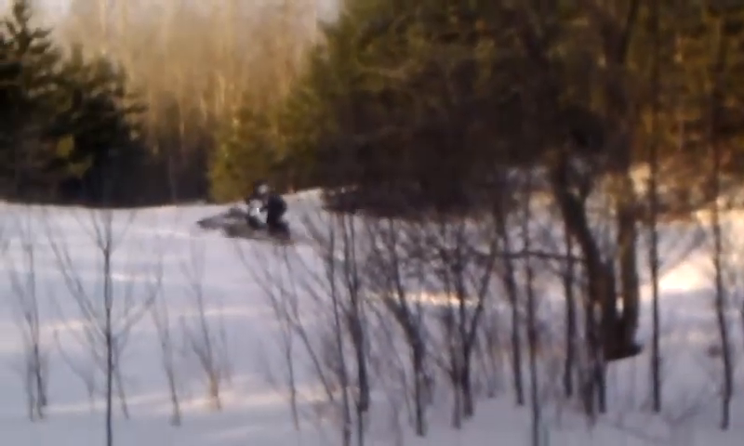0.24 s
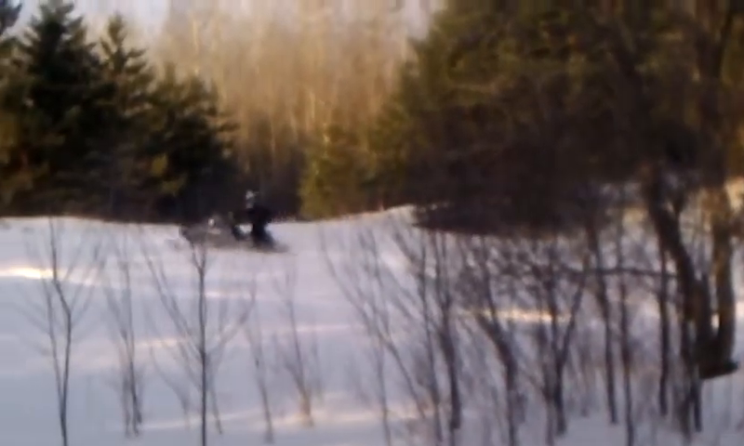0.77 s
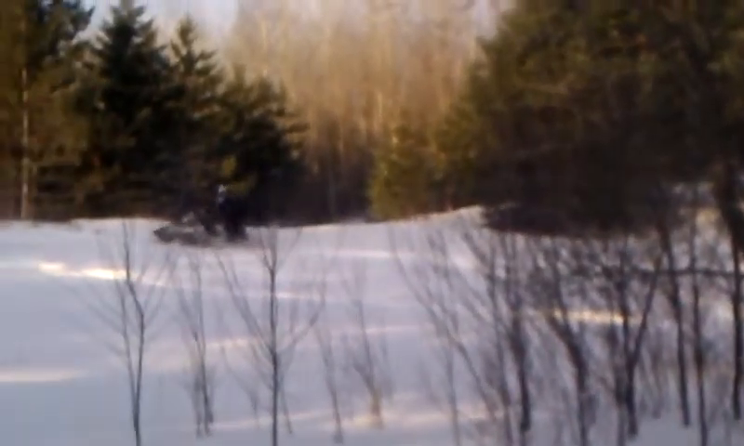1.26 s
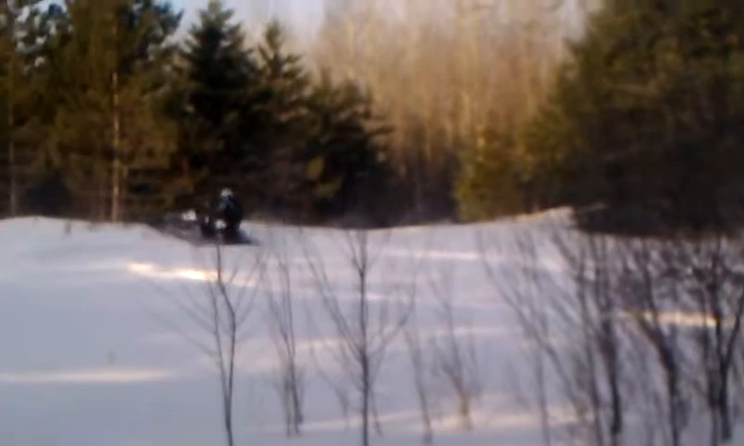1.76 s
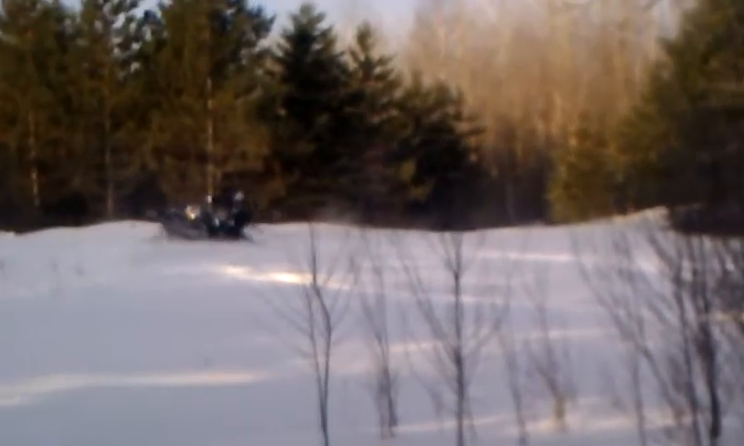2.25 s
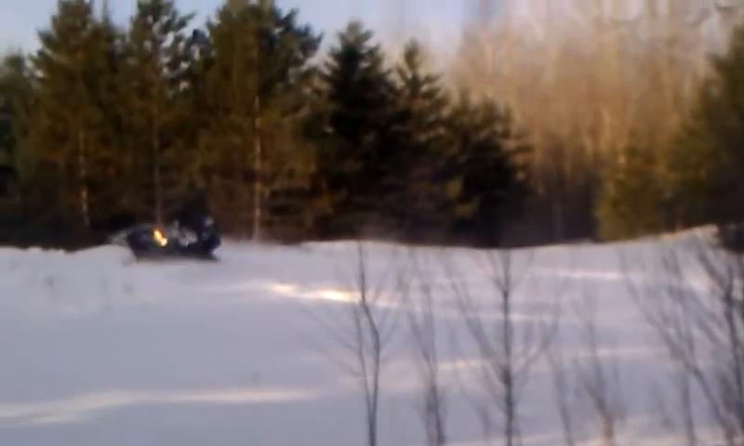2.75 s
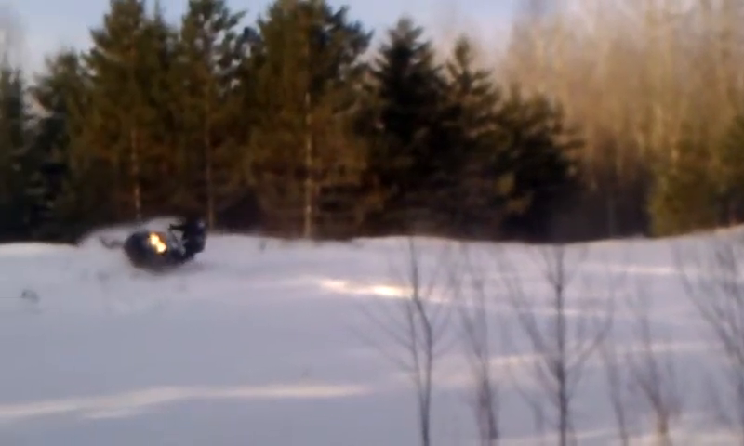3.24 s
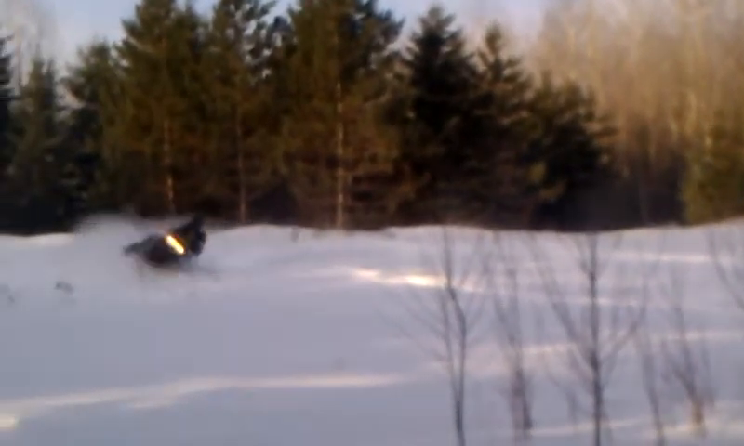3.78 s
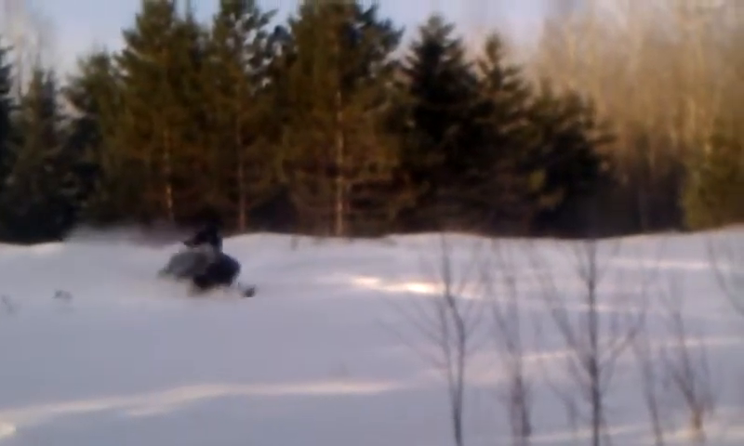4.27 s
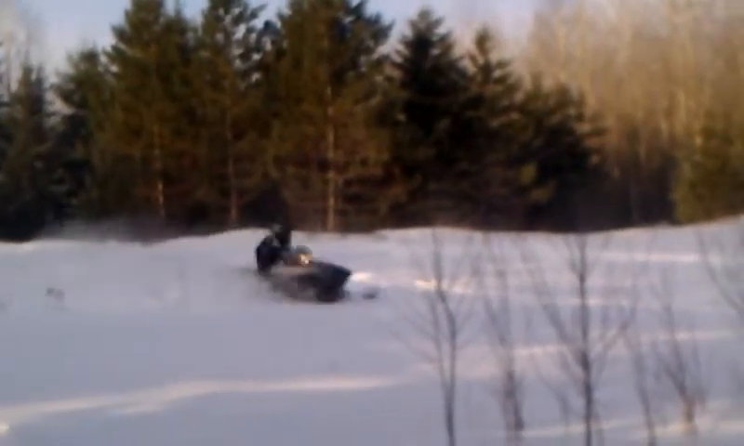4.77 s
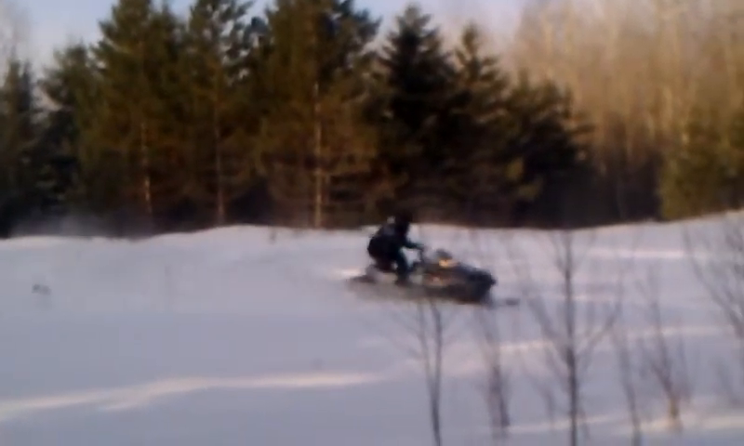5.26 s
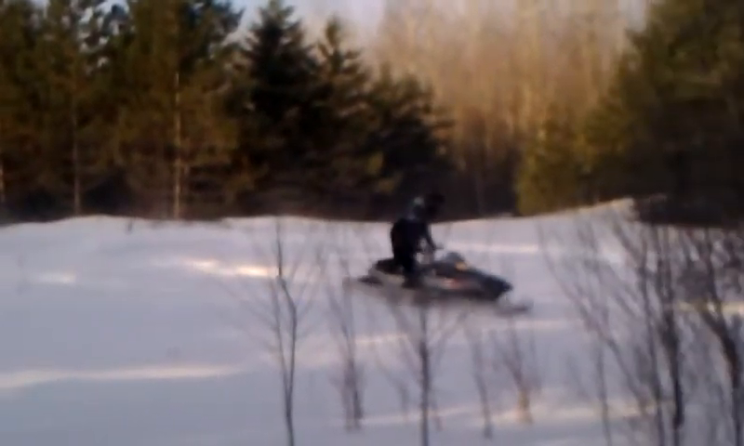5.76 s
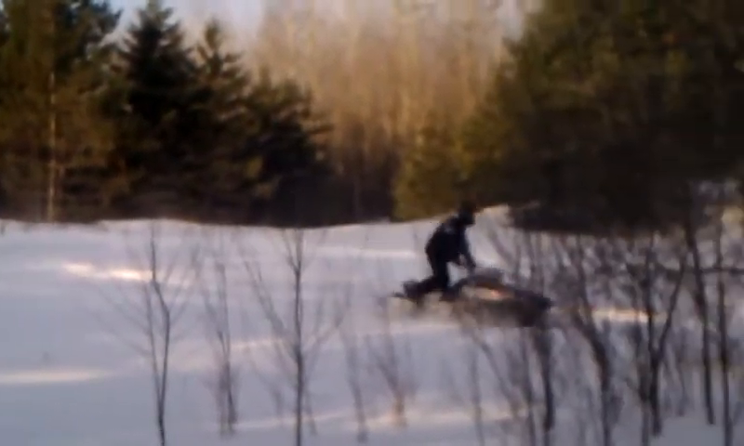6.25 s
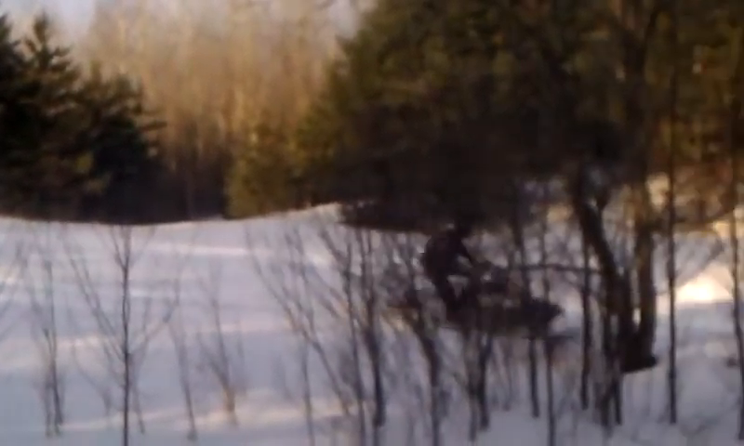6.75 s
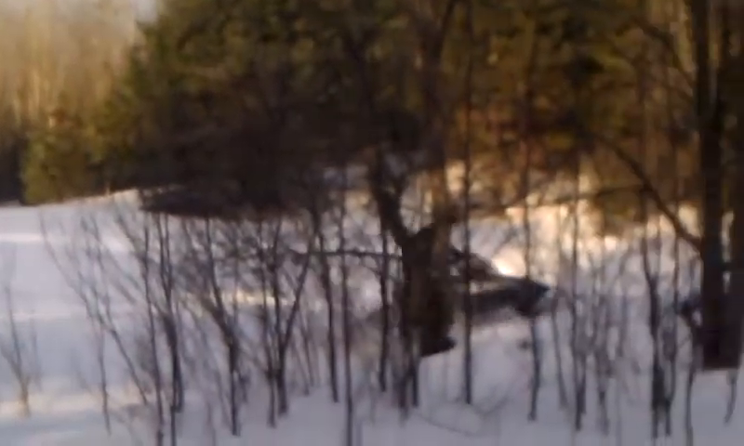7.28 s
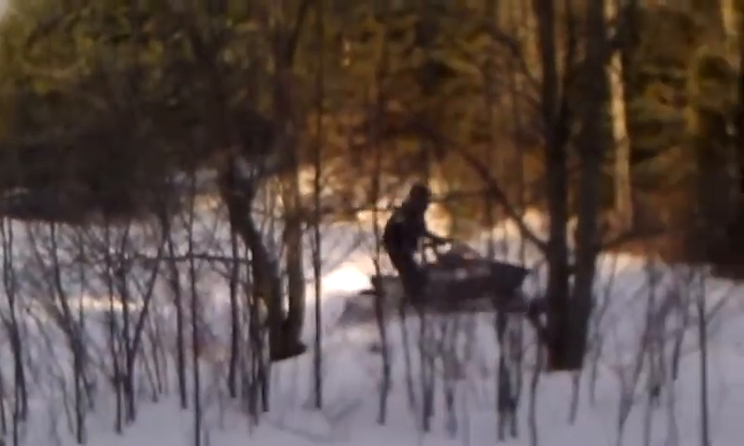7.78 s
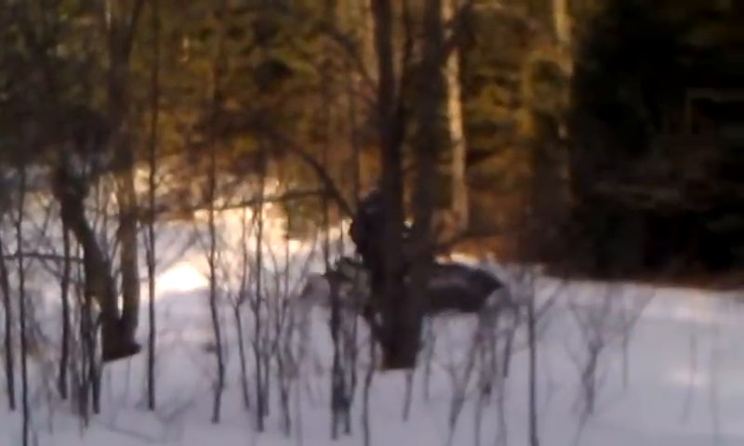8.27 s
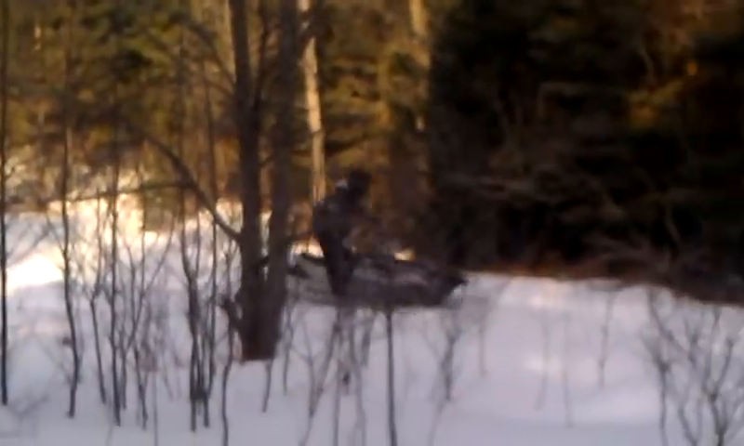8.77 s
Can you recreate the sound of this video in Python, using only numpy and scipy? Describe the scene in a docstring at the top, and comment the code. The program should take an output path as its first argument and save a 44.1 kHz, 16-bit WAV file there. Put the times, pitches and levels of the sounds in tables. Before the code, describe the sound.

A two-stroke snowmobile runs over snow beside woods, captured by one overloaded outdoor microphone. From 0 s it buzzes raspily, with short rev rises around 0.3 and 0.8 s, sinking to a low burble near 1.35 s. It revs again at 1.5 s, and from about 1.8 to 4.9 s holds a piercing, nasal, fluttering howl at almost steady pitch, stronger and brighter around 4 s as it swings round, with thin sizzle growing on top. At 4.9 s the throttle closes; pitch tumbles until 5.6 s while a faint howl echoes from the trees. A hard barking blip at 5.7 s leads into popping around 6.2 s, a longer rev from 6.5 to 7.1 s, more pops, and a sharp stab at 7.5 s. Dense crackling backfires follow from 7.7 s, thinning into a throaty near-idle burble with track and clutch rattle until 9 s.

```python
"""Two-stroke snowmobile on a snowy field

The engine blips, howls flat out through a turn, then comes back near the listener with pops and barks.
Multiples of the firing rate and pulsed noise, filtered by pipe and silencer, make the exhaust.
Steady partials make the howl, decaying pipe modes the pops, and coloured noise the track and clutch.
The forest edge returns scattered echoes; the microphone clips and gain control holds the level down."""
import sys
import numpy as np
from scipy import signal
from scipy.io import wavfile
from scipy.ndimage import uniform_filter1d

SR = 44100
rng = np.random.default_rng(int(sys.argv[2]) if len(sys.argv) > 2 else 0)


def generate_wav(signal):
    """Clip the signal to [-1, 1] and save it as 16-bit WAV at the path in sys.argv[1]."""
    frames = np.transpose(np.atleast_2d(signal))
    scaled = np.clip(frames, -1, 1) * 32767
    pcm = np.round(scaled).astype(np.int16)
    wavfile.write(sys.argv[1], SR, pcm)


N = 397782
T = np.arange(N) / SR  # time of every sample, s

# the strongest partials of the tuned pipe swell and fade as the sled turns; columns:
# time_s, firing_rate_hz, then rms level_db of multiples 1, 2, 3, 4, 5, 6 and 8 before a common trim
TURN = [(1.76, 209.6, -58, -43, -17, -52, -44, -27, -42),
        (1.86, 239.8, -50, -36, -36.5, -28, -36, -36.5, -39),
        (1.95, 251.5, -45, -31, -26, -26.5, -33, -24, -32),
        (2.04, 262.4, -40, -30, -34, -36, -31, -25.5, -32),
        (2.11, 264.3, -44, -33, -22, -35, -36, -26, -27),
        (2.2, 261.7, -41, -30.5, -38, -26.5, -29, -27, -27),
        (2.3, 263.9, -38, -34, -26, -26.5, -36, -34, -34), (2.402, 262, -40, -25, -30, -29, -30, -27, -22),
        (2.499, 264, -35, -37, -30, -35, -21, -35, -20.5),
        (2.6, 262.2, -36, -30.5, -24, -28, -23.5, -31, -23.5),
        (2.7, 262.5, -48, -36, -18.5, -30.5, -24, -29, -16.5),
        (2.8, 262.8, -42, -32, -24.5, -35, -22.5, -33, -31),
        (2.902, 263.6, -40.5, -36, -23.5, -31, -25.5, -27, -24),
        (3.05, 263.4, -46, -27.5, -24.5, -28.5, -23, -30, -32),
        (3.2, 265.5, -51, -30, -21.5, -26, -23, -26, -24),
        (3.35, 265.7, -49, -28.5, -24, -24, -36, -24, -23.5),
        (3.501, 265.7, -54, -39, -19, -30.5, -26.5, -37, -26.5),
        (3.65, 266, -43, -34, -19, -24, -26.5, -33, -26),
        (3.779, 265.6, -43, -32, -34, -29.5, -25.5, -21.5, -31.5),
        (3.92, 267, -45, -35.5, -23.5, -28.5, -29, -32, -24),
        (4.05, 264.9, -34, -37, -25.5, -32, -27, -28.5, -30),
        (4.181, 264.6, -39, -32.5, -24.5, -31.5, -30.5, -34, -30),
        (4.319, 267, -29.5, -31, -18, -34, -31, -20, -28.5),
        (4.45, 265.3, -37, -43, -25.5, -27.5, -22, -23.5, -23),
        (4.58, 265.8, -34, -37, -22.5, -30, -21, -27, -31),
        (4.699, 264.2, -44, -41, -19.5, -26, -21.5, -24, -30),
        (4.82, 262.8, -48, -28.5, -21, -28, -25, -25, -24)]
# tone of the exhaust: time_s, place in a row of four colours (0-3)
TONE = [(0, 1.4), (1.7, 0.69), (2.1, 2), (4.85, 1.03), (5.5, 1.25), (5.7, 1.68), (5.85, 1.3), (6.4, 2.53),
        (7.7, 2.14), (8.15, 2.65)]


def gain_of(db):
    """Logarithmic level: decibels to an amplitude ratio."""
    return 10 ** (np.asarray(db) / 20)


def evened(x):
    """Power normalization: scales a signal to rms 1."""
    return x / np.sqrt(np.mean(x ** 2) + 1e-20)


def curves(rows):
    """Linear interpolation: each column of a table of (time_s, values) at every sample."""
    time_s, *columns = np.transpose(rows)
    return [np.interp(T, time_s, column) for column in columns]


def during(start_s, end_s, fade_s):
    """Trapezoidal window: a gate with sloping sides."""
    return np.clip((T - start_s) / fade_s, 0, 1) * np.clip((end_s - T) / fade_s, 0, 1)


def flutter(rate_hz):
    """Band-limited chance: Gaussian points at the given rate, joined by lines."""
    return np.interp(T * rate_hz, np.arange(2000), rng.standard_normal(2000))


def colour(x, points):
    """Minimum-phase filtering: a causal filter with the given outline of (frequency_hz, gain_db)."""
    point_hz, point_db = np.transpose(points)
    hz = abs(np.fft.fftfreq(4096, 1 / SR))
    gain_db = np.interp(np.log(hz + 1), np.log(point_hz + 1), point_db)
    # the Hilbert transform of the log gain gives the phase
    spectrum = np.exp(np.conj(signal.hilbert(np.log(gain_of(gain_db)))))
    taps = np.fft.ifft(spectrum).real[:2048]
    return signal.oaconvolve(x, taps)[:N]


def low_pass(x, hz):
    """Linear-phase band limiting: a steep low-pass filter."""
    taps = signal.firwin(511, hz, window=("kaiser", 9), fs=SR)
    return signal.oaconvolve(x, taps[None], "same")


def add(mix, start_s, sound):
    """Superposition: mixes a sound in at its start time."""
    part = mix[round(start_s * SR):][:len(sound)]
    part += sound[:len(part)]


def partial(cycles, k, level_db, flutter_db, scatter=0.21, scatter_hz=16):
    """Multipath interference: a trembling harmonic beats with its shifting reflections off the snow."""
    paths = 1 + scatter * (flutter(scatter_hz) + 1j * flutter(scatter_hz))
    tone = np.exp(2j * np.pi * (k * cycles + rng.random()))
    rms = gain_of(level_db + flutter_db * flutter(60))
    return np.sqrt(2) * rms * (paths * tone).real


def firings(cycles, uneven, smear=0.1005, count=22):
    """Dispersion: the harmonics of each firing pulse are smeared along the pipe, and firings vary in strength.

    Multiples 2-4 are left to the drone."""
    multiples = [1, *range(5, count)]
    pulse = sum(np.cos(2 * np.pi * k * cycles - smear * k ** 2) for k in multiples)
    return evened(pulse * np.exp(uneven * flutter(170) - uneven ** 2))


def puffs(cycles, steady, length):
    """Pulsed turbulence: noise flares at each firing and decays over a length in firing cycles."""
    flare = np.exp(-(cycles % 1) / length)
    return evened((steady + flare) * rng.standard_normal(N))


def throttle():
    """Engine load: opening of the throttle, the dB that it adds, and the share of rasp in the exhaust."""
    # squeezes of the throttle: opens_s, shuts_s, load_db, rasp_share (0-1)
    squeezes = [(0.197, 0.462, 1.5, 0.39), (0.65, 0.869, 3.5, 0.6), (1.434, 1.639, 1.5, 0.56),
                (1.775, 4.894, 2, 0.08), (4.852, 4.985, 1, 0.5), (5.666, 5.906, 4.5, 0.22),
                (6.464, 7.17, 2, 0.52), (7.421, 7.636, 6, 0.15)]
    open_time_s, shut_time_s = 0.053, 0.031
    shut_rasp = 0.82  # share of rasp with the throttle shut
    opens_s, shuts_s, load_db, rasp = np.transpose(squeezes)
    rise = np.clip((T - opens_s[:, None]) / open_time_s, 0, 1)
    fall = np.clip((shuts_s[:, None] - T) / shut_time_s, 0, 1)
    gates = rise * fall
    return gates.sum(0), load_db @ gates, shut_rasp + (rasp - shut_rasp) @ gates


def exhaust(cycles, on_pipe, rasp, uneven, db=2.5, rasp_db=9, rasp_hz=450):
    """Source and filter: firing pulses and gas rasp pass a silencer whose colour changes with time."""
    # exhaust colours named by tone: frequency_hz, relative gain_db
    nasal = [(60, -48), (130, -24), (200, -12), (290, -17), (400, -4), (510, -6), (620, 2), (800, 7),
             (970, -7), (1150, -16), (1450, 11), (1750, -17), (2150, -2), (2700, -25), (4500, -32),
             (8000, -64)]
    broad = [(60, -43.5), (150, -20.5), (300, -8.5), (450, -6.5), (700, -9.5), (950, 0.5), (1150, -6.5),
             (1500, 2), (2150, 0.5), (2700, -19.5), (4500, -29), (8000, -63.5)]
    biting = [(55, -56.5), (110, -16), (180, -13), (270, -13.5), (400, -13), (550, -7.5), (720, -0.5),
              (950, -0.5), (1150, -14.5), (1330, 3.5), (1470, 8.5), (1650, -8), (1850, -3), (2300, -8),
              (2900, -36), (4500, -50), (8000, -65.5)]
    throaty = [(55, -68), (120, -19.5), (200, 3.5), (280, -3.5), (400, 5.5), (540, -0.5), (800, 6),
               (950, -3), (1130, -8.5), (1400, 0.5), (1900, -7), (2400, -7), (3200, -29), (8000, -57)]
    pulses = firings(cycles, uneven) * np.sqrt(1 - rasp) * (1 - on_pipe)
    high_pass = signal.butter(1, rasp_hz, "high", fs=SR)
    gas = signal.lfilter(*high_pass, puffs(cycles, steady=1.0, length=0.037))
    drive = pulses + gain_of(rasp_db) * np.sqrt(rasp) * gas
    tone, = curves(TONE)
    out = np.zeros(N)
    for place, points in enumerate([nasal, broad, biting, throaty]):
        share = np.maximum(1 - abs(tone - place), 0)  # crossfade of neighbouring colours
        out += share * evened(colour(drive, points))
    return gain_of(db) * out


def drone(cycles, speed, level_db, flutter_db=1.8):
    """Resonance: multiples 2-5 carry the note, each swelling as it crosses a mode of the silencer."""
    # low resonances of the silencer at tone places 0-1 and 2-3: frequency_hz, relative level_db
    lower_modes = [(260, -20), (330, -13.5), (410, -5.5), (540, -14), (615, -2), (700, -10.5), (820, -2.5),
                   (960, -8)]
    upper_modes = [(260, -14.5), (330, -19.5), (400, -5), (450, -6.5), (530, -10), (600, -17.5), (670, 1),
                   (790, -8), (860, -7), (1060, -9)]
    # the multiples trade strength as the outlet swings about: time_s, extra level_db of multiples 2, 3, 4, 5
    voicing = [(.4, -0.5, 0.5, -0.5, 3), (1.45, -1.5, 3.5, 3, 3), (1.62, 5, -7, -2, -4),
               (1.75, 5, -3.5, 1, 1), (4.95, 3.5, 5, 12, -5), (5.25, 1, -5, -9, -16),
               (5.6, -2, 0.5, -14, -13), (5.7, 9, -1.5, 1, 1), (5.8, 0.5, -8, 5.5, -1),
               (6.1, -2, 0.5, -11, -9.5), (6.6, 0, 1, 2, -3.5), (7.1, 4, -1.5, -2, -2), (7.4, 0, 3, -7, -7),
               (7.55, -2.5, -1, 5, -7), (7.9, 1, 1.5, -7, -6), (8.3, -1.5, 3.5, -12, -13),
               (9.0, -1.5, 2, -1, -14)]
    out = np.zeros(N)
    blend = np.clip(curves(TONE)[0] - 1, 0, 1)
    for k, voice_db in enumerate(curves(voicing), 2):
        lower_db = np.interp(k * speed, *np.transpose(lower_modes))
        upper_db = np.interp(k * speed, *np.transpose(upper_modes))
        resonance_db = lower_db + blend * (upper_db - lower_db)
        out += partial(cycles, k, level_db + voice_db + resonance_db, flutter_db, scatter=0.056)
    return out


def howl(cycles, level_db, strong_db=1.5, weak_db=-2.3, fade_db=3.0, flutter_db=2.5, count=32):
    """Pipe resonance: flat out, the tuned pipe rings in steady partials that fade slowly over the snow."""
    # multiples of the firing rate that have columns of their own in the table of the turn
    strong_orders = (1, 2, 3, 4, 5, 6, 8)
    # the other partials, side-on and head-on: frequency_hz, relative level_db
    side_on = [(1850, -6.5), (2370, -9.5), (2640, -12), (2900, -16.5), (3160, -20), (3420, -21.5),
               (3690, -18), (3950, -12.5), (4220, -11), (4480, -18.5), (4740, -15), (5010, -16.5),
               (5270, -26), (5540, -29), (5800, -18), (6060, -27), (6330, -21), (6590, -19), (6850, -35),
               (7110, -25), (7500, -33), (8200, -23.5)]
    head_on = [(1850, -5.5), (2390, -13), (2660, -11.5), (2930, -21), (3200, -15), (3460, -14),
               (3750, -16.5), (4000, -8.5), (4260, -21), (4520, -14), (4800, -16), (5050, -18), (5300, -16),
               (6100, -32), (6600, -18), (6900, -29), (7450, -17), (7900, -19.5)]
    # start_s and end_s of the swing from side-on to head-on
    swing_s = (2.94, 3.34)
    # side-on, unequal cylinders sound between the partials: multiples, and their mean rms level_db
    half_orders = (1.5, 2.5, 3.5, 6.5, 7.5)
    half_db = (-48.5, -43, -37, -34, -37)
    howl_hz = 264  # firing rate at which the outlines are read
    strong = dict(zip(strong_orders, curves(TURN)[1:]))
    facing = np.interp(T, swing_s, [0, 1])
    # scatter in the ignition timing frays the high partials
    cycles = cycles + .005 * flutter(200)
    out = np.zeros(N)
    for k in range(1, count):
        side_db = np.interp(k * howl_hz, *np.transpose(side_on))
        front_db = np.interp(k * howl_hz, *np.transpose(head_on))
        outline_db = side_db + facing * (front_db - side_db)
        if k in strong:
            partial_db = strong[k] + strong_db
        else:
            partial_db = level_db + weak_db + outline_db + fade_db * flutter(4)
        out += partial(cycles, k, partial_db, flutter_db, scatter=0.23)
    for k, db in zip(half_orders, half_db):
        half = partial(cycles, k, db + fade_db * flutter(3.1), flutter_db, scatter=0.15)
        out += (1 - facing) * half
    return out


def barks(cycles, width_hz=130, gas=1.0):
    """Forced resonance: firings and gas drive one pipe mode into a brief, dense ring."""
    # barks, mostly on a hard stab of throttle: centre_s, half_length_s, mode_hz, level_db
    bark_rows = [(0.283, 0.06, 950, -44), (0.725, 0.05, 920, -40), (1.517, 0.056, 930, -34),
                 (5.711, 0.016, 860, -22.5), (5.781, 0.031, 810, -25.5), (5.849, 0.039, 2090, -26),
                 (6.577, 0.015, 1360, -25.5), (6.816, 0.041, 1385, -29.5), (7.051, 0.031, 1390, -32.5),
                 (7.52, 0.027, 730, -32), (7.598, 0.039, 1428, -22), (7.806, 0.0097, 1420, -20)]
    drive = firings(cycles, uneven=0.16) + gas * puffs(cycles, steady=.5, length=.4)
    out = np.zeros(N)
    for centre_s, half_length_s, hz, db in bark_rows:
        mode = signal.butter(2, [hz - width_hz, hz + width_hz], "band", fs=SR, output="sos")
        ring = signal.sosfilt(mode, drive)
        swell = np.exp(-((T - centre_s) / half_length_s) ** 4)
        out += gain_of(db) * swell * ring / np.sqrt(np.average(ring ** 2, weights=swell))
    return out


def pops(speed, db=0.0, gas=0.16, gas_s=0.013, upper_hz=1200, fade=0.34, count=4):
    """Impulse response: unburnt charge bangs and rings the pipe, and the next firings ring it again."""
    # late firings: time_s, ring peak_db, level_db of the next firing relative to the pop,
    # extra level_db of the upper pipe modes
    pop_rows = [(5.698, -11.5, -8, -4), (6.1511, -19, -5, 1), (6.172, -13.5, -15, 8),
                (6.2368, -12.5, -6, 1), (6.282, -13.5, -7, 3), (6.333, -15, -5, -1), (7.036, -16, -4, 5),
                (7.186, -14, -10, 0), (7.215, -16, -9, -10), (7.281, -16, -11, -16),
                (7.346, -16.5, -20, -9), (7.38, -15, -12.5, -4.5), (7.4, -15.5, -3, -12), (7.66, -10, 1, 4),
                (7.7324, -8.5, -6, 1), (7.7481, -9.5, -3.5, 6), (7.7923, -16, -1, 0),
                (7.81, -11.5, -13, -6), (7.8564, -9.5, -4, -1), (7.875, -11, -9, -2),
                (7.909, -12.5, -12, -14), (7.963, -9.5, -7, -3), (7.984, -13.5, -6, -10),
                (8.04, -17.5, -2, 1), (8.1, -23, 6, -6), (8.178, -14, -9, -9), (8.2013, -19, -8, -10),
                (8.2514, -14.5, -15, -7), (8.275, -15, -9, -7), (8.31, -14, -13, -6),
                (8.3477, -14.5, -3, -11), (8.408, -18.5, -1, -4), (8.4214, -18, -5, -12),
                (8.475, -21, 4, -7), (8.555, -21, -12, -7), (8.615, -21, -13, 6), (8.7319, -16, -15, 3),
                (8.7696, -14.5, -16, -4), (8.785, -18, -5, -6), (8.845, -22, 2, -13), (8.918, -18, -9, -10),
                (8.97, -22, 1, -9)]
    # modes of the exhaust: frequency_hz, bandwidth_hz, relative level_db
    pipe_modes = [(407, 360, -4), (750, 180, 3.5), (858, 280, 13.5), (1440, 180, 12.5), (2150, 440, -4)]
    out, t = np.zeros(N), np.arange(1500) / SR
    open_end = signal.butter(2, [270, 2600], "band", fs=SR, output="sos")  # it radiates no bass
    for start_s, peak_db, after_db, upper_db in pop_rows:
        ring = np.zeros(len(t))
        for hz, width_hz, mode_db in pipe_modes:
            decay = np.exp(-np.pi * width_hz * t)
            ring += gain_of(mode_db + upper_db * (hz > upper_hz)) * decay * np.sin(2 * np.pi * hz * t)
        ring = signal.sosfilt(open_end, ring)
        ring /= abs(ring).max()
        firing_rate = speed[round(start_s * SR)]
        for k in range(count):
            burst = rng.standard_normal(len(t)) * np.exp(-t / gas_s)
            puff = signal.fftconvolve(ring, burst)[:len(t)]
            bang = ring + gas * puff / abs(puff).max()
            # after the second firing each is weaker than the last
            size = gain_of(after_db) * fade ** (k - 1) if k else 1
            add(out, start_s + k / firing_rate, gain_of(peak_db + db) * size * bang)
    return out


def clatter(cycles, db=3, slap_db=1.44):
    """Amplitude modulation: the bright noise of track, clutch and casing beats with the firings."""
    # colour of track, clutch and chain case: frequency_hz, relative gain_db
    rattle_colour = [(200, -32), (900, -9), (1500, 4.5), (2250, 5), (2750, -0.5), (3300, -6), (4100, 2),
                     (4800, 1), (5600, -5.5), (6600, -1), (7400, -9), (8300, -12.5), (8800, -38),
                     (10000, -83.5)]
    rattle = puffs(cycles, steady=1.0, length=1.0) * gain_of(slap_db * flutter(110))
    return gain_of(db) * evened(colour(rattle, rattle_colour))


def echo(cycles, db=-1, flutter_db=1.8):
    """Delayed reflection: the last of the howl returns from the forest edge as the engine winds down."""
    # fading of the returned howl: time_s, level_db of multiples 1, 2, 3, 4, 5 before a common trim
    returned = [(4.82, -60, -60, -57, -62, -58), (4.88, -45, -29, -23, -31, -24),
                (4.94, -56, -35, -28.5, -35, -33), (4.99, -55, -44, -30, -40, -26),
                (5.05, -53, -41, -30.5, -33, -35), (5.12, -50, -42.5, -44, -42, -35),
                (5.18, -59, -43, -30, -39, -48), (5.24, -55, -41, -29.5, -48, -40),
                (5.3, -48, -37, -50, -46, -47), (5.35, -54, -44, -42, -44, -38),
                (5.42, -55, -37.5, -33, -53, -47), (5.5, -64, -48, -41, -45, -45),
                (5.59, -59, -41, -43, -49, -42), (5.68, -58, -62, -62, -63, -65)]
    delay_s = .78
    late = np.interp(T - delay_s, T, cycles)
    tones = np.zeros(N)
    for k, level_db in enumerate(curves(returned), 1):
        tones += partial(late, k, level_db + db, flutter_db, scatter=0.082)
    return tones * during(returned[0][0], returned[-1][0], .02)


def forest(x, near_db=-16, near_t60=0.27, far_db=-21, far_s=0.57, spread_s=0.27):
    """Diffuse scattering: sparse echoes from nearby trunks, then a faint wash from the forest edge."""
    # colour of what the trees send back: frequency_hz, gain_db
    tree_colour = [(100, -29), (270, -10.5), (520, 0), (800, -0.5), (1060, 0.5), (1350, -5), (2000, -0.5),
                   (4000, -22.5), (9000, -48.5)]
    t = np.arange(SR) / SR
    trunks = rng.choice([-1., 1.], SR) * (rng.random(SR) < 2000 / SR)  # about 2000 echoes a second
    near = trunks * gain_of(-60 * t / near_t60) * (t > .008)
    far = trunks * np.exp(-((t - far_s) / spread_s) ** 4)
    response = gain_of(near_db) * near / np.linalg.norm(near)
    response += gain_of(far_db) * far / np.linalg.norm(far)
    return colour(signal.oaconvolve(x, response)[:N], tree_colour)


def fizz(db):
    """Filtered noise: a thin top-end sizzle grows during the howl and stops with it."""
    hiss = colour(rng.standard_normal(N), [(8500, -6), (9300, 6.0), (12000, 2.0), (16000, -3.0)])
    gate = during(3.02, 6.3, 0.78) * during(3, 4.9, 0.016)  # slow rise, quick end
    return gain_of(db + 2.0 * flutter(40)) * evened(hiss) * gate


def scene(cylinder_gap=0.088):
    """Common phase: one crankshaft drives every engine layer; speed and throttle set how loud each is."""
    # engine speed before and after the turn: time_s, firing_rate_hz
    speed_rows = [(0, 138), (.18, 159), (.31, 200), (.39, 211), (.5, 180), (.64, 154), (.73, 174),
                  (.8, 197), (.87, 198), (1.02, 171), (1.15, 151), (1.35, 132), (1.45, 148.6), (1.54, 175),
                  (1.62, 198), (1.65, 202), (1.73, 199), (4.86, 265), (4.9, 235), (4.95, 216), (5.02, 184),
                  (5.12, 159), (5.3, 135), (5.6, 118), (5.636, 143), (5.698, 163), (5.746, 186),
                  (5.818, 215), (5.856, 221), (5.92, 192), (6.13, 149), (6.28, 149), (6.48, 155.4),
                  (6.57, 179), (6.66, 190), (6.77, 175), (6.93, 165.5), (7.1, 166), (7.3, 154), (7.41, 153),
                  (7.474, 159), (7.554, 195), (7.615, 207), (7.71, 178), (7.87, 156), (8.03, 141.5),
                  (8.2, 133.6), (9.02, 136.2)]
    # base levels as the sled moves off, turns and passes, ahead of the speed and load terms:
    # time_s, exhaust_db, drone_db, track_db
    pass_levels = [(0, -34.5, -41.5, -44.5), (.6, -40.5, -44.5, -47), (1.0, -41, -46, -46),
                   (1.3, -39, -47, -44), (1.7, -36.5, -39, -44), (2.0, -42, -36, -47.5),
                   (2.35, -35, -44, -45), (3.05, -33.5, -37, -46.5), (3.65, -38.5, -38.5, -50.5),
                   (4.25, -38, -41, -49.5), (4.85, -36, -48, -42.5), (5.3, -38, -51.5, -41),
                   (5.6, -34, -29, -40.5), (5.8, -37, -41, -41.5), (6.05, -37, -43.5, -44),
                   (6.55, -35, -33.5, -44.5), (7.1, -35, -36, -45), (7.7, -36, -37.5, -43),
                   (8.2, -36, -32.5, -42.5), (9.02, -34, -32.5, -38)]
    # level changes over two runs of pops: start_s, end_s, exhaust_change_db, drone_change_db
    pop_runs = [(6.11, 6.376, -2, 0), (7.66, 8.044, 0.5, -2.5)]
    # level of the whole sled as it swings to face the microphone: time_s, extra level_db
    facing_levels = [(1.7, -2.5), (2.1, -2), (3.05, -3.5), (3.3, 1.5), (3.9, 10.5), (4.75, 0.5), (4.92, -1)]
    idle_hz = 138.05  # firing rate that the base levels refer to
    exhaust_db_per_octave, drone_db_per_octave, track_db_per_octave = 14.5, 14.5, 20.5
    track_load = 0.27  # share of the load dB that the track follows
    uneven_shut, uneven_open = 0.14, 0.31  # unevenness of the firings
    shut_drone_db, sinks_until_s = -1.5, 4.6  # until then, the note sinks when the throttle shuts

    speed, = curves(sorted(tuple(row[:2]) for row in [*speed_rows, *TURN]))
    octaves = np.log2(speed / idle_hz)
    opening, load_db, rasp = throttle()
    exhaust_db, drone_db, track_db = curves(pass_levels)
    exhaust_db = exhaust_db + exhaust_db_per_octave * octaves + load_db
    drone_db = drone_db + drone_db_per_octave * octaves + load_db
    drone_db += shut_drone_db * (1 - opening) * (T < sinks_until_s)
    track_db = track_db + track_db_per_octave * octaves + track_load * load_db
    for start_s, end_s, exhaust_change_db, drone_change_db in pop_runs:
        popping = during(start_s, end_s, 0.018)
        exhaust_db = exhaust_db + exhaust_change_db * popping
        drone_db = drone_db + drone_change_db * popping

    uneven = uneven_shut + (uneven_open - uneven_shut) * opening
    on_pipe = during(1.744, 4.9, 0.072)  # the stretch of the howl
    waver = .0012 * flutter(25) + .003 * flutter(180)
    cycles = np.cumsum(speed * (1 + waver)) / SR  # one cycle per firing

    sled = gain_of(exhaust_db) * exhaust(cycles, on_pipe, np.clip(rasp, 0, 1), uneven)
    sled += (1 - on_pipe) * drone(cycles, speed, drone_db)
    sled *= 1 + cylinder_gap * np.cos(np.pi * cycles)  # unequal cylinders give half-order lines
    sled += on_pipe * howl(cycles, exhaust_db)
    sled += barks(cycles) + pops(speed)
    sled += gain_of(track_db) * clatter(cycles)
    sled *= gain_of(curves(facing_levels)[0])
    return (sled + forest(sled) + echo(cycles))[None]


def record(dry, ceiling=0.35, lopsided=0.058, hold_db=-18.0):
    """Clipping and compression: the microphone overloads, unevenly under the howl; gain control holds the level."""
    # upper limits of the recorded engine sound and of the whole sound, sizzle included
    treble_hz, edge_hz = 8600, 15750
    bias = lopsided * during(1.7, 4.9, .05)
    clipped = np.clip(dry, bias - ceiling, bias + ceiling)
    power = abs(uniform_filter1d(clipped ** 2, size=2600))
    power_db = 10 * np.log10(power + 1e-12)
    reduction_db = uniform_filter1d(np.maximum(power_db - hold_db, 0), size=1000)
    held = clipped / gain_of(reduction_db)
    # only the sizzle reaches above the treble limit
    return low_pass(low_pass(held, treble_hz) + fizz(db=-41), edge_hz)


dry = scene()
out = record(dry)
generate_wav(out)
```